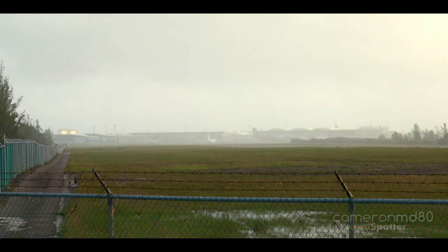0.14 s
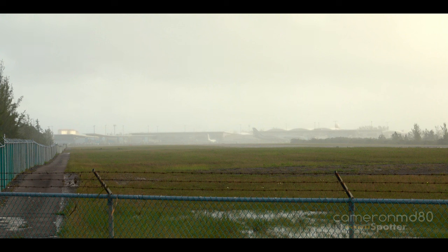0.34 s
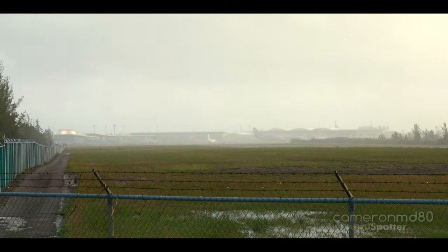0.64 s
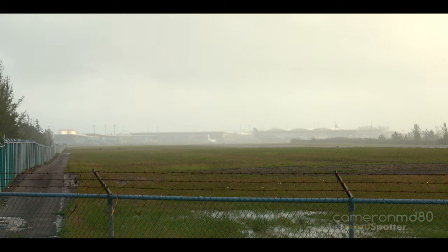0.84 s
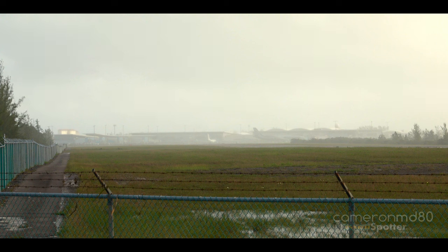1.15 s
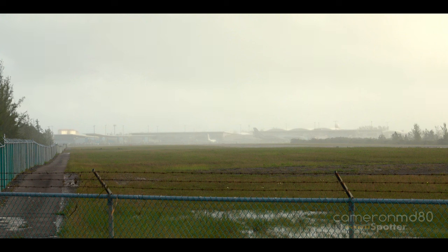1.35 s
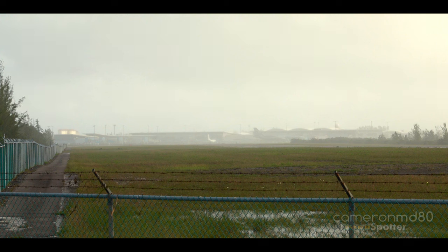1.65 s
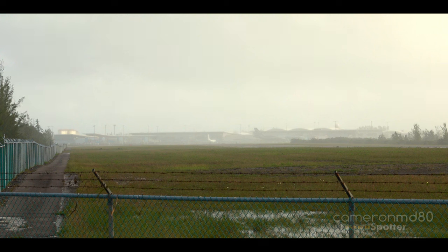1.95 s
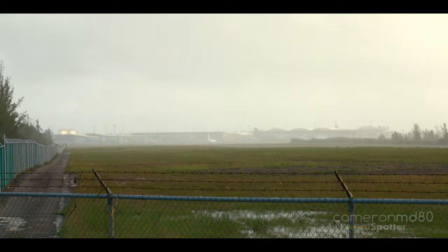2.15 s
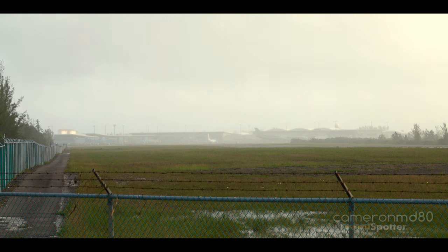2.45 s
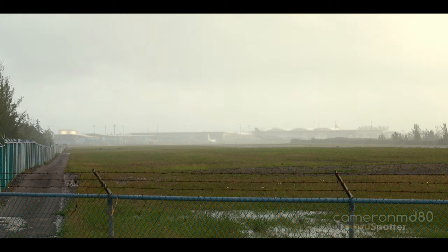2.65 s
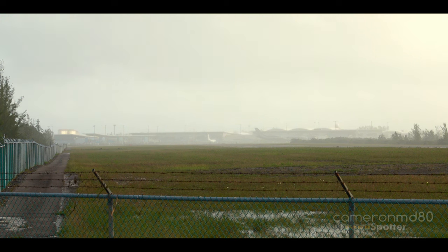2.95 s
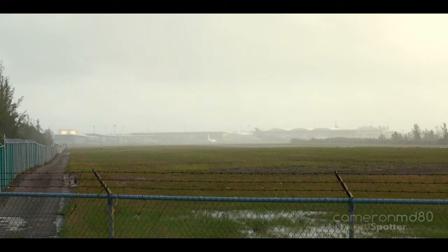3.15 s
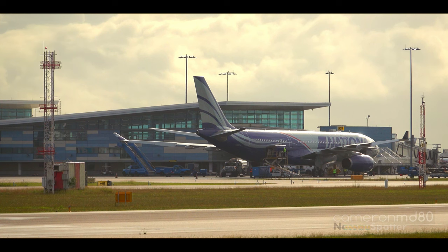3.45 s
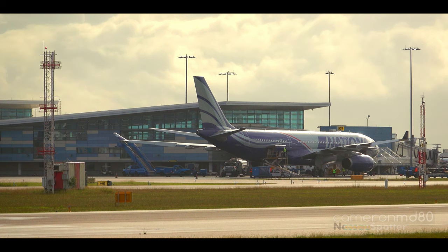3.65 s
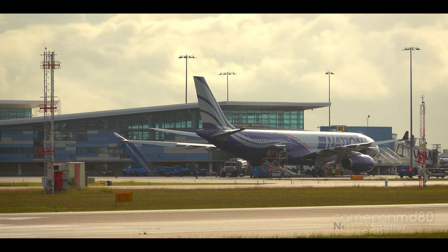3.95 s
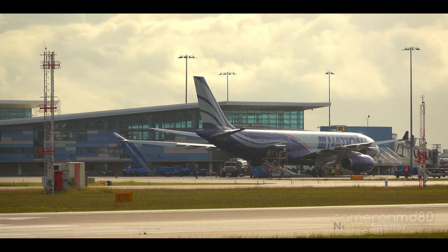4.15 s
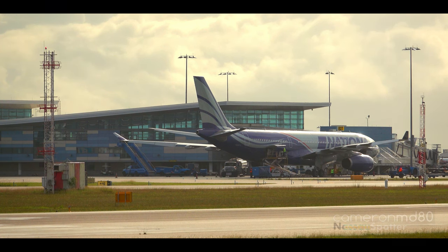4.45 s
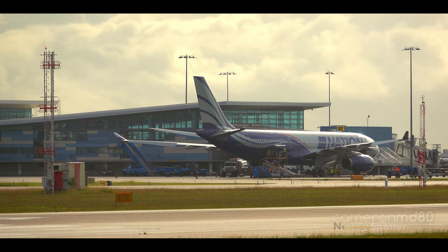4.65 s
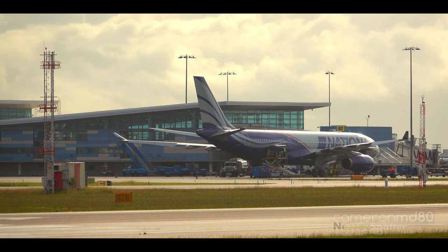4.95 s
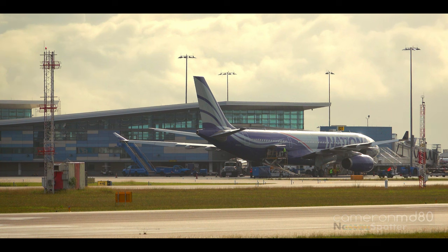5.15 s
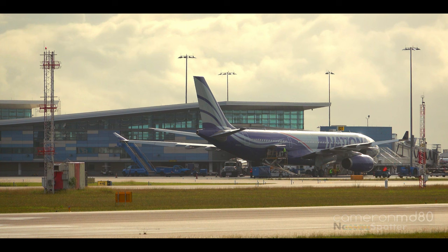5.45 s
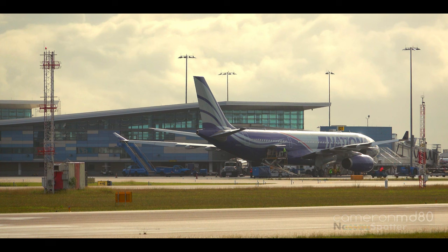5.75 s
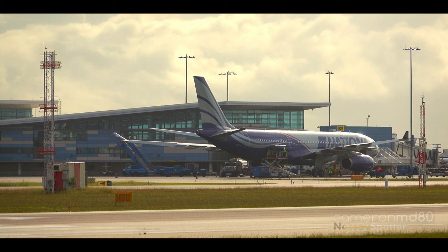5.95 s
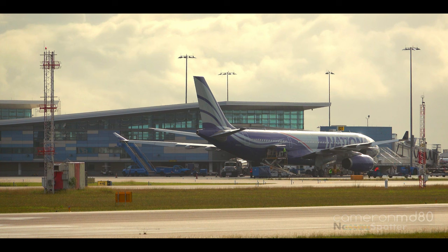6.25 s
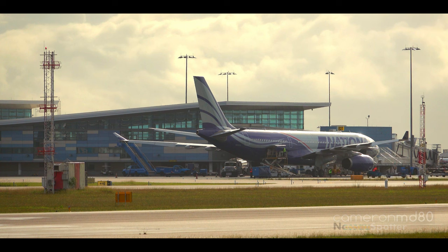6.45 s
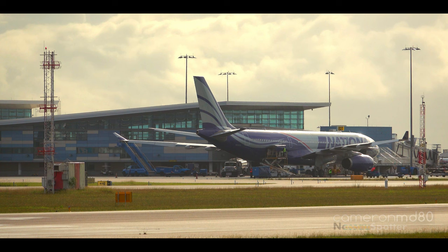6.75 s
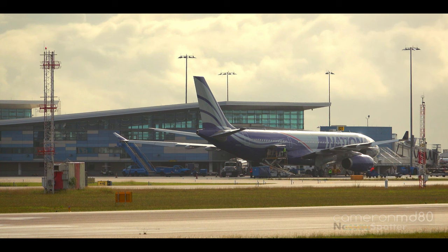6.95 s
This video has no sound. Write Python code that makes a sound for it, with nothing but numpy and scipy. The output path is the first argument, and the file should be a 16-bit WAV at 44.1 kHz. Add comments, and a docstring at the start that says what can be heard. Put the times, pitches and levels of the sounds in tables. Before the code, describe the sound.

A breezy open airfield heard from a fence, with jet engines far away. From 0 s a deep, steady-pitched engine drone swells strongly over soft roar and muted hiss, a faint cricket buzzing high and close by. Between about 1.1 and 1.5 s gusts thud into the microphone; the metal fence gives sharp dry ticks, the clearest near 1.3 s, with loose wire chattering, a brush of grass and a rumble surge. The drone dips around 2 s, then returns weaker near 2.6 s as wire scrapes and taps lightly. From 2.3 to 3.35 s the place blends into the apron side: the cricket and drone fade, jet roar grows fuller and hiss brighter. Grass rustles softly around 3.3 to 3.7 s. Until 7 s the rush stays steady, with faint flickering turbine whines, a quiet shimmering insect chorus and low wind bumps, notably around 4.5, 5.5 and 6.2 s.

```python
"""First an engine drone swells under far jet roar, at a wet fence on an airfield's edge, a cricket close by.
Gusts buffet the microphone; the fence ticks and rattles. From 2.3 to 3.35 s the place shifts nearer the apron,
where the hiss brightens, turbines whine faintly and the insect chorus rises as the cricket fades.
Shaped noise makes roar, hiss, wind, grass, chorus and rattle; sines make drone, whine and insect notes;
filtered clicks with decaying sines make the taps."""
import sys
import numpy as np
from scipy import signal
from scipy.fft import rfft, irfft, next_fast_len
from scipy.io import wavfile
from scipy.ndimage import uniform_filter1d, minimum_filter1d, map_coordinates

SR = 44100
rng = np.random.default_rng(int(sys.argv[2]) if len(sys.argv) > 2 else 0)


def file_out(sig):
    """Save sig as 16-bit WAV at sys.argv[1]."""
    # one column per channel
    cols = np.atleast_2d(sig).T
    # limit, then scale
    lim = np.clip(cols, -1, 1)
    pcm = np.round(lim * 32767).astype(np.int16)
    wavfile.write(sys.argv[1], SR, pcm)


N = 312669


def amp(db):
    """Decibels to gain."""
    return 10 ** (np.asarray(db) / 20)


def unit(x):
    """x scaled to rms 1."""
    return x / np.sqrt(np.mean(x ** 2) + 1e-20)


def clock():
    """The time of each sample [s]."""
    return np.arange(N) / SR


def curves(rows):
    """One value per sample for each column after the time."""
    s, *columns = np.transpose(rows)
    return [np.interp(clock(), s, column) for column in columns]


def wobble(rate):
    """A random curve joining normal draws (mean 0, deviation 1), rate knots a second."""
    knots = rng.standard_normal(int(N * rate / SR) + 4)
    return map_coordinates(knots, [clock() * rate], mode="nearest")


def turns(hz):
    """Cycles completed at a changing frequency, from a random start."""
    return np.cumsum(hz) / SR + rng.random()


def sine(hz):
    """A sine of peak 1 at a changing frequency."""
    return np.sin(2 * np.pi * turns(hz))


def bell(centre, width):
    """A bell-shaped rise and fall; at one width [s] from its centre it is down to 1/e."""
    return np.exp(-((clock() - centre) / width) ** 2)


def swells(rows):
    """Gain of bell-shaped swells (centre [s], width [s], level [dB]) whose powers add."""
    return np.sqrt(sum((amp(db) * bell(s, width)) ** 2 for s, width, db in rows))


def filtered(x, response):
    """x times a response of frequency, padded so that the end does not wrap to the start."""
    size = next_fast_len(N + 8192)
    return irfft(rfft(x, size) * response(np.fft.rfftfreq(size, 1 / SR)), size)[:N]


def coloured(x, spectrum):
    """x shaped by (frequency [Hz], gain [dB]) points on a log axis."""
    f, db = np.transpose(spectrum)
    return filtered(x, lambda hz: amp(np.interp(np.log(hz + 1), np.log(f), db)))


def noise(spectrum):
    """Steady coloured noise of rms 1."""
    return unit(coloured(rng.standard_normal(N), spectrum))


def far_noise(spectrum, patchy_db):
    """Noise of rms 1 whose bands fade in and out on their way through moving air."""
    bands = signal.stft(rng.standard_normal(N), nperseg=1024)[2]
    field = rng.standard_normal(bands.shape)
    field = uniform_filter1d(field, size=7, axis=0)  # across frequency
    field = uniform_filter1d(field, size=14, axis=1)  # across time
    patchy = signal.istft(bands * amp(patchy_db * unit(field)))[1][:N]
    return unit(coloured(patchy, spectrum))


# Share of the power heard from the apron side: (time [s], share [0-1])
APRON_SHARE = [(0, 0.12), (2.3, 0.01), (2.7, 0.42), (3.35, 1)]


def places():
    """Gains of the fence side and the apron side, crossing at equal power."""
    share = np.clip(curves(APRON_SHARE)[0], 0, 1)
    return np.sqrt(1 - share), np.sqrt(share)


# Colour of the faint background hiss: (frequency [Hz], gain [dB])
AIR_SPECTRUM = [(100, 0), (5000, 0.24), (10000, -0.31), (16000, -2)]


def air():
    """A faint even noise, a little stronger by the apron."""
    return amp(-72.0 + 3.4 * curves(APRON_SHARE)[0]) * noise(AIR_SPECTRUM)


# Colour of the blended chorus: (frequency [Hz], gain [dB])
CHORUS_SPECTRUM = [(6800, -54), (7550, -11.5), (7950, 0.5), (8250, 2.5), (8450, 4.5), (8750, -7.5),
                   (8930, -0.5), (9120, -20.5), (9800, -52)]
# Insects that stand out of the chorus: (start [s], end [s], pitch [Hz], peak level [dB])
NEARER_SINGERS = [(0, 3.9, 8320, -82.5), (3.2, 5.7, 8780, -71), (3.4, 7.09, 8200, -78),
                  (6.3, 7.09, 8600, -87)]
FIELD_CHORUS_DB, APRON_CHORUS_DB = -79, -66


def chorus():
    """Many insects blur into a shimmering band of noise; a few nearer ones hold their own buzzing pitch."""
    t = clock()
    far, near = places()
    level = np.hypot(far * amp(FIELD_CHORUS_DB), near ** 2 * amp(APRON_CHORUS_DB))
    shimmer = amp(0.6 * wobble(2) + 0.89 * wobble(70))
    out = level * shimmer * noise(CHORUS_SPECTRUM)
    for start, end, hz, db in NEARER_SINGERS:
        # fades in over 0.27 s before the start and out as long after the end
        singing = np.clip(np.minimum(t - start, end - t) / 0.27 + 1, 0, 1)
        out += amp(db + 1.7 * wobble(60)) * singing * sine(hz + 55 * wobble(250))
    return out


# Colour of brushed grass before each gust tilts it: (frequency [Hz], gain [dB])
GRASS_SPECTRUM = [(600, -24), (1800, 9.5), (3300, 3.5), (5000, -4), (6300, -4.5), (9500, -13.5),
                  (11500, -32)]
# Gusts in the grass: (start [s], length [s], level [dB], brightness [dB per octave])
GRASS_GUSTS = [(1.327, 0.22, -67.5, 5), (1.385, 0.055, -58, 3), (3.29, 0.3, -55, -1.5),
               (3.528, 0.18, -53.5, -5)]


def grass():
    """Short gusts brush through the grass, each a swell of noise with its own brightness."""
    out = np.zeros(N)
    for start, length, db, tilt in GRASS_GUSTS:
        progress = np.clip((clock() - start) / length, 0, 1)
        swell = np.sqrt(np.abs(np.sin(np.pi * progress)))
        colour = [(hz, gain + tilt * np.log2(hz)) for hz, gain in GRASS_SPECTRUM]
        out += amp(db + 1.4 * wobble(50) + 1.9 * wobble(500)) * swell * noise(colour)
    return out


CRICKET_DB, STROKES_PER_S = -74, 42.1


def cricket(pitch_hz=7135, fall_hz=260, duty=0.5):
    """Each closing of the wings gives a short note that falls in pitch, over a steady rasping band."""
    far, _ = places()
    stroke = turns(STROKES_PER_S + 0.22 * wobble(3.4)) % 1 / duty  # 0-1 sounds, above 1 is silent
    swell = np.sqrt(np.abs(np.sin(np.pi * np.minimum(stroke, 1))))
    note = sine(pitch_hz - fall_hz * (stroke - 0.5) + 40 * wobble(400))
    rasp = amp(-4.5) * noise([(4500, -34), (6200, -9.5), (6900, -2), (7700, -14), (9000, -39.5)])
    level = np.sqrt(far) * amp(CRICKET_DB + 0.73 * wobble(30))
    return level * (unit(swell * note) + rasp)


# Colour of the click: (frequency [Hz], gain [dB])
CLICK_SPECTRUM = [(500, -13), (1200, 1), (2300, -14), (3800, 9), (5500, 5), (8500, 4), (10500, -9),
                  (15000, -26.5)]
# Ringing of the metal: (frequency [Hz], level [dB], time to fall 60 dB [s])
METAL_MODES = [(1150, 7.5, 0.01), (1620, 3.5, 0.0081), (3540, -9, .016), (4080, -5, 0.016),
               (5450, -12, 0.0067), (7540, -13.5, .012)]
# Sharp taps on the fence: (time [s], level that click and ring are set against [dB])
FENCE_TAPS = [(1.139, -50.5), (1.3383, -39), (1.366, -52), (1.714, -55), (2.395, -58), (2.769, -51)]


def taps():
    """Each tap is a hard click and a very short ring of the metal."""
    out = np.zeros(N)
    for s, db in FENCE_TAPS:
        age = np.maximum(clock() - s, 0)
        click = coloured(signal.unit_impulse(N, round(s * SR)), CLICK_SPECTRUM)
        click = amp(10.5) * click / np.abs(click).max()
        ring = np.zeros(N)
        for hz, level, t60 in METAL_MODES:
            mode_db = level + rng.normal(0, 1.8)  # each tap excites the modes differently
            ring += amp(mode_db - 60 * age / t60) * np.sin(2 * np.pi * hz * age)
        out += amp(db) * (click + ring)
    return out


# Colour of the loose wire: (frequency [Hz], gain [dB])
WIRE_SPECTRUM = [(1200, -37.5), (2400, 0), (3200, -3.5), (3950, -10), (4220, 2.5), (4420, 2.5),
                 (4620, -7.5), (5600, -11), (6500, -9), (11000, -34)]
# Bursts of the wire: (start [s], length before release [s], level [dB])
WIRE_BURSTS = [(1.19, .08, -71), (1.315, 0.23, -66.5), (1.623, .13, -75), (2.33, .42, -63)]
ATTACK_S, RELEASE_S = 0.05, 0.08
CHATTER_HZ, ACCENT_DB = 105.5, 4


def rattle():
    """A loose fence wire scrapes and chatters in bursts, every third contact accented."""
    contacts = turns(CHATTER_HZ + 2 * wobble(16))
    accent = amp(ACCENT_DB * (contacts % 3 < 1))
    strikes = accent * np.exp(-(contacts % 1) / 0.16)
    scrape = 0.41
    chatter = (strikes + scrape) * amp(1.1 * wobble(60)) * rng.standard_normal(N)
    level = np.zeros(N)
    for start, length, db in WIRE_BURSTS:
        age = clock() - start
        attack = np.clip(age / ATTACK_S, 0, 1)
        level += amp(db) * attack * np.exp(-np.maximum(age - length, 0) / RELEASE_S)
    return level * unit(coloured(chatter, WIRE_SPECTRUM))


# Colour of the wind at the microphone: (frequency [Hz], gain [dB])
BUFFET_SPECTRUM = [(8, -4.5), (18, -2.5), (30, -3), (45, -11), (65, -15), (100, -24.5), (160, -37.5),
                   (350, -60.5), (900, -97)]
# The breeze at the microphone: (time [s], level [dB])
BREEZE_LEVEL = [(0, -34), (1.0, -25), (2.1, -30), (4.2, -25.5), (7.09, -29)]
# Gusts on top of it: (centre [s], width [s], level [dB])
MIC_GUSTS = [(1.14, 0.057, -15.5), (1.46, 0.086, -17.5), (3.71, 0.058, -23.5), (4.55, .06, -23),
             (5.5, 0.26, -24.5), (5.94, 0.08, -23.5), (6.26, 0.13, -22)]
LUMP_DB, LUMPS_PER_S = 1.47, 8


def wind():
    """A lumpy breeze and a few stronger gusts push on the microphone as low turbulent noise."""
    eddies = noise(BUFFET_SPECTRUM)
    strength = np.sqrt(np.abs(uniform_filter1d(eddies ** 2, size=6000)) + 1e-3)
    breeze = amp(curves(BREEZE_LEVEL)[0] + LUMP_DB * wobble(LUMPS_PER_S))
    # the wind sets the force, the eddies only the fine shape
    return np.hypot(breeze, swells(MIC_GUSTS)) * unit(eddies / strength)


# Colour of the exhaust rumble: (frequency [Hz], gain [dB])
SURGE_SPECTRUM = [(50, -0.5), (110, 1.5), (180, 5), (260, 1), (350, 2), (600, -2.5), (900, -12.5),
                  (1800, -52.5)]
# Its swells: (centre [s], width [s], level [dB])
RUMBLE_SWELLS = [(1.28, 0.23, -37.5), (2.8, 0.17, -39), (3.28, 0.29, -40.5), (6.55, 0.26, -46.5)]


def surges():
    """Swells of rumble as the wind bends the far exhaust noise down to the ground."""
    return swells(RUMBLE_SWELLS) * noise(SURGE_SPECTRUM)


# Partials of the engine note: (multiple of its pitch, relative level [dB])
ENGINE_ORDERS = [(1, 2.5), (1.5, -29.5), (2, -23)]
# Its swells: (centre [s], width [s], level [dB])
ENGINE_SWELLS = [(.33, 0.35, -22.5), (.93, 0.39, -25.5), (1.39, 0.22, -25), (1.79, .22, -36),
                 (2.58, 0.2, -29.5), (3.25, 0.38, -39)]
DRONE_HZ, DRONE_WANDER_HZ = 84.44, 0.41
HUM_HZ, HUM_DB = 248.2, -52  # rms level


def drone():
    """A low engine note of locked partials swells and sinks; a fainter wavering hum stays with the fence."""
    far, _ = places()
    phase = 2 * np.pi * turns(DRONE_HZ + DRONE_WANDER_HZ * wobble(6))
    note = sum(amp(level) * np.sin(order * phase) for order, level in ENGINE_ORDERS)
    note_level = swells(ENGINE_SWELLS) * amp(-0.07 + 0.6 * wobble(8.8))
    hum = amp(HUM_DB + 2.2 * wobble(7.9)) * sine(HUM_HZ + 2.15 * wobble(11))
    return np.sqrt(2) * (note_level * note + far * hum)  # root 2 takes a sine's rms to its peak


# Colours of roar and hiss at the fence and by the apron: (frequency [Hz], gain [dB])
FENCE_ROAR_SPECTRUM = [(50, -13), (120, 12), (200, -0.5), (290, -4), (390, 0), (470, -4), (660, -2),
                       (820, -5), (1000, -17.5), (1400, -30.5), (2500, -60)]
APRON_ROAR_SPECTRUM = [(40, 1), (85, 9.5), (130, 7.5), (200, 2), (300, 0), (520, -2), (680, -1),
                       (850, -5.5), (1100, -18), (1500, -22.5), (2500, -56)]
FENCE_HISS_SPECTRUM = [(500, -25), (950, 0), (1200, -5), (1400, 1.5), (1650, -8.5), (2100, -12),
                       (2600, -18), (3500, -23), (4800, -30), (8000, -42)]
APRON_HISS_SPECTRUM = [(500, -28.5), (950, -0.5), (1200, 1), (1450, 0), (1700, -7.5), (2100, -9.5),
                       (2600, -13.5), (3100, -19), (4200, -23.5), (5000, -28.5), (7000, -30.5),
                       (10000, -42)]
# Moving air lifts or muffles the hiss: (centre [s], width [s], change [dB])
AIR_DRIFTS = [(0.25, .35, -1.7), (1.66, 0.074, 3), (2.05, 0.42, -4.5), (3.4, 0.29, 0.5), (6.35, 0.36, -2)]
# Turbine tones: (frequency [Hz], peak level [dB])
TURBINE_TONES = [(695, -60), (1395, -56.5), (3758, -78.5), (3855, -83.5), (4153, -81), (5563, -84)]
FENCE_ROAR_DB, APRON_ROAR_DB = -40, -37.5
FENCE_HISS_DB, APRON_HISS_DB = -51, -46
ROAR_WAVER_DB = 0.35
WHINE_FLICKER_DB, WHINE_FLICKERS_PER_S = 3.5, 8


def jets():
    """Exhaust roar and mixing hiss; from the apron they are stronger and carry wandering turbine tones."""
    far, near = places()
    roar = far * amp(FENCE_ROAR_DB) * far_noise(FENCE_ROAR_SPECTRUM, patchy_db=-0.1)
    roar += near * amp(APRON_ROAR_DB) * far_noise(APRON_ROAR_SPECTRUM, patchy_db=0.53)
    hiss = far * amp(FENCE_HISS_DB) * far_noise(FENCE_HISS_SPECTRUM, patchy_db=1.3)
    hiss += near ** 2 * amp(APRON_HISS_DB) * far_noise(APRON_HISS_SPECTRUM, patchy_db=1.73)
    drift_db = sum(db * bell(s, width) for s, width, db in AIR_DRIFTS)
    whine = np.zeros(N)
    for hz, db in TURBINE_TONES:
        level = amp(db + WHINE_FLICKER_DB * wobble(WHINE_FLICKERS_PER_S))  # flicker in the moving air
        whine += level * sine(hz + 2 * wobble(2) + 5 * wobble(45))
    roar *= amp(ROAR_WAVER_DB * wobble(3))
    hiss *= amp(drift_db + 0.32 * wobble(4.2))
    return roar + hiss + near * whine


def scene():
    """Everything meets at one microphone."""
    insects = chorus() + cricket()
    nearby = grass() + taps() + rattle() + wind()
    engines = surges() + drone() + jets()
    return (air() + insects + nearby + engines)[None]


CEILING, TOP_HZ = 0.245, 15750  # limiter ceiling [of full scale], band limit [Hz]


def record(dry):
    """A limiter ducks around peaks above its ceiling; nothing passes above the band limit."""
    needed = np.minimum(1, CEILING / (np.abs(dry[0]) + 1e-9))
    gain = uniform_filter1d(minimum_filter1d(needed, size=700), size=350)
    return filtered(dry[0] * gain, lambda hz: hz < TOP_HZ)[None]


dry = scene()
out = record(dry)
file_out(out)
```